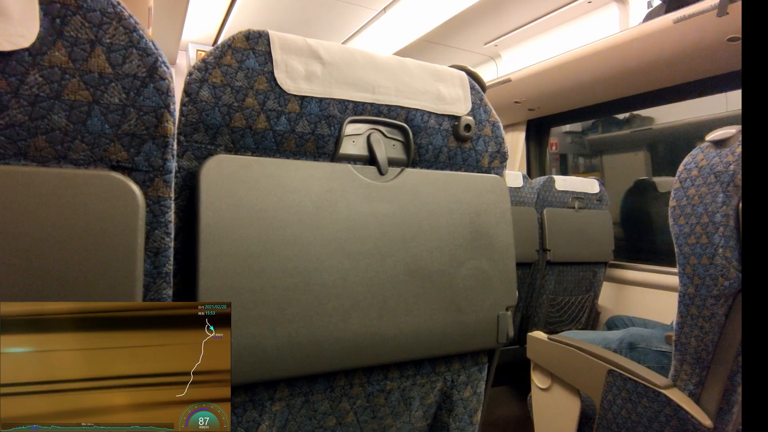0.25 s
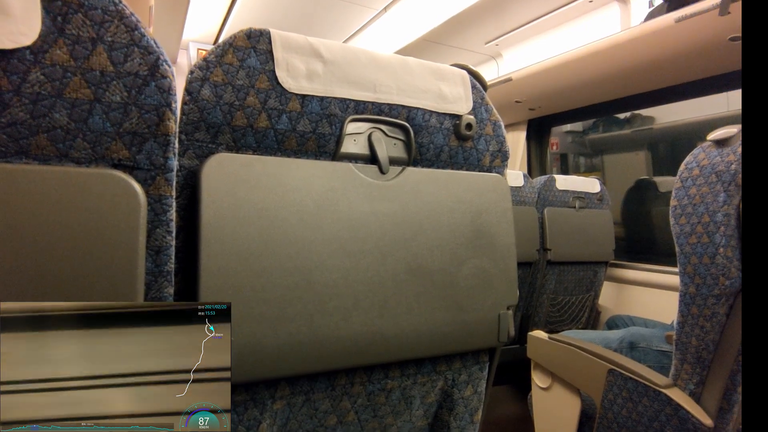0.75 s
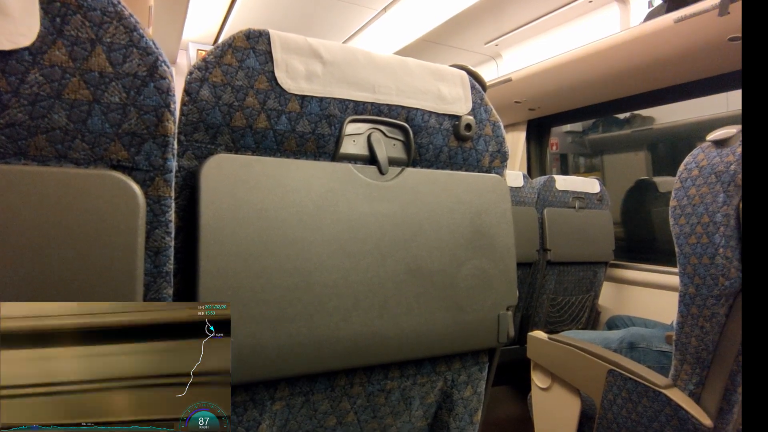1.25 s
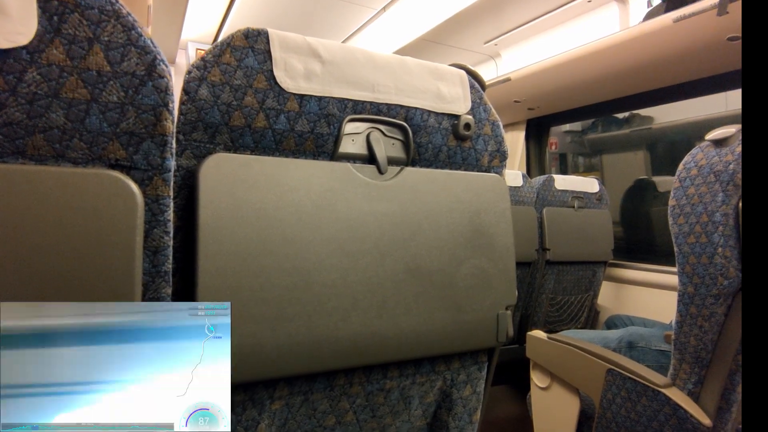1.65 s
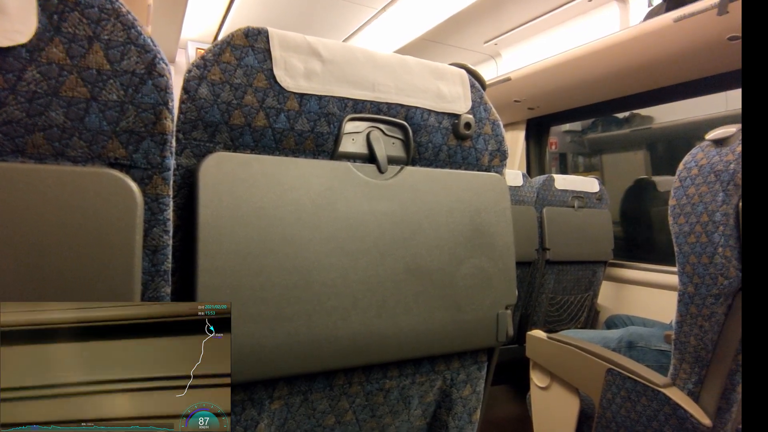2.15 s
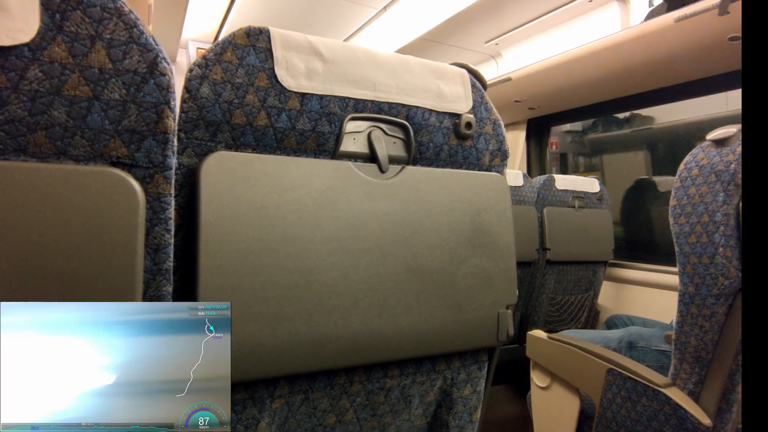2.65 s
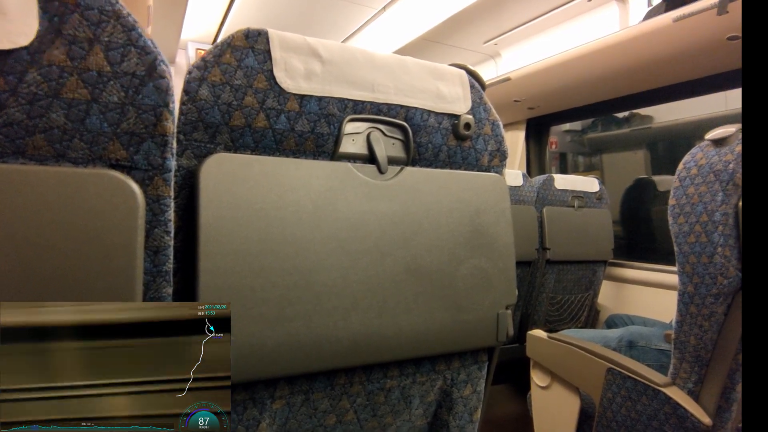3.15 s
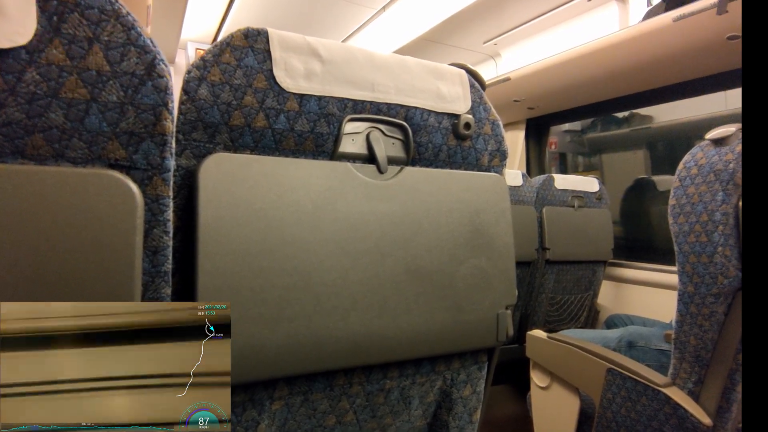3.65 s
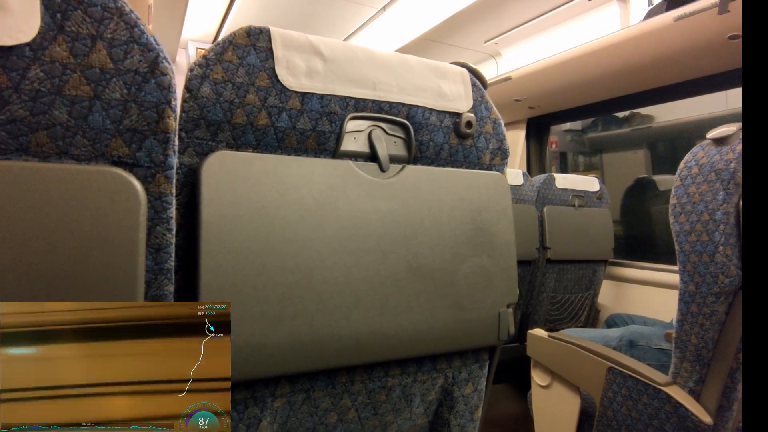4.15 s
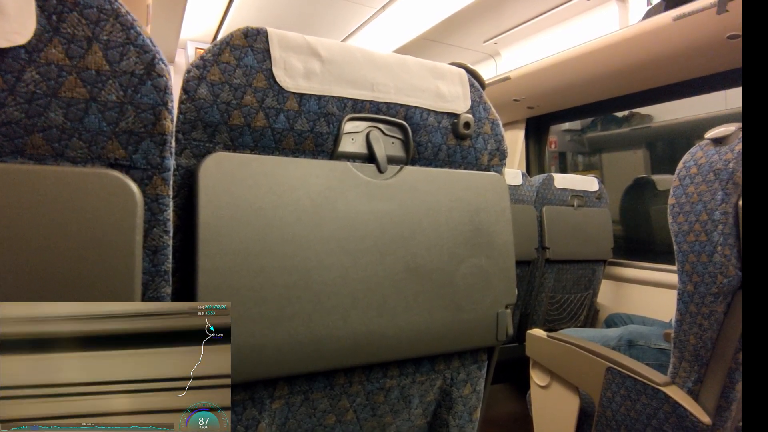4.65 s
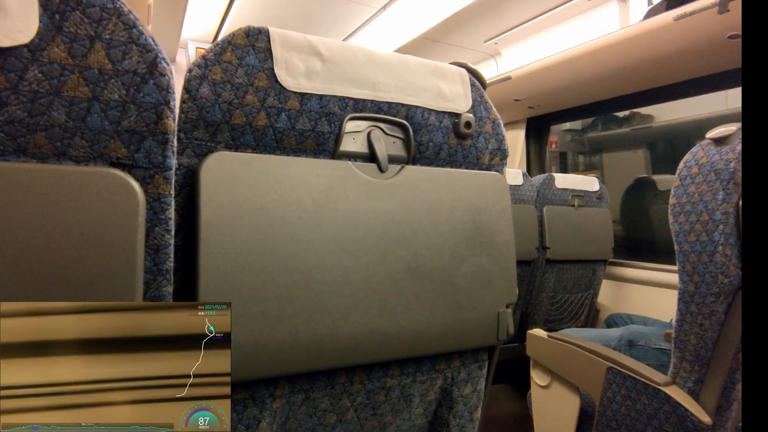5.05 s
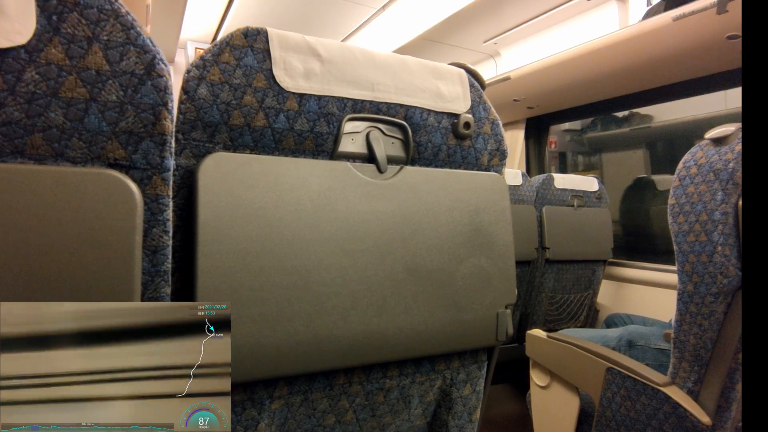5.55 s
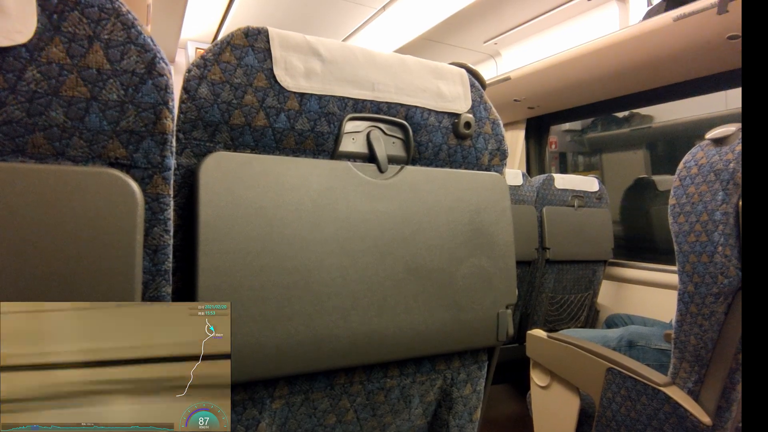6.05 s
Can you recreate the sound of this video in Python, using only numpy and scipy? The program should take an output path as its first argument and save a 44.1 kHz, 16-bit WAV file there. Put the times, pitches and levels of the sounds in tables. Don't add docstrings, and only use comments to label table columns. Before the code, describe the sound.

Heard from a passenger seat, rough rails sing in a fluttering drone with dull floor booms and faint clicks, easing into steady airy rumble.

```python
import sys
import numpy as np
from scipy import signal
from scipy.fft import rfft, irfft
from scipy.io import wavfile
from scipy.ndimage import uniform_filter1d, minimum_filter1d

SR = 44100
rng = np.random.default_rng(int(sys.argv[2]) if len(sys.argv) > 2 else 0)


def waveform_to_disk(signal):
    frames = np.transpose(np.atleast_2d(signal))
    scaled = np.clip(frames, -1, 1) * 32767
    samples = np.round(scaled).astype(np.int16)
    wavfile.write(sys.argv[1], SR, samples)


def amplitude_ratio(level_db):
    exponent = np.asarray(level_db, float) / 20
    return 10 ** exponent


N = 277819
TIME = np.arange(N) / SR
HZ = np.maximum(np.fft.rfftfreq(N, 1 / SR), 1)

# [time_s, roughness_db]
ROUGHNESS = [(0, 2.5), (.6, 2.5), (.95, 1), (1.4, 0), (1.85, 2), (2.4, -1), (2.8, 0), (3.1, -2),
             (3.7, -2.5), (4.3, -5.5), (4.7, -6.5), (5.3, -8.5), (5.9, -11.5), (6.3, -10)]
# [start_s, hold_s, pitch_hz, level_db]
CORRUGATION = [(-.02, 0.038, 698, -16.5), (0.095, 0.11, 719.8, -15.5), (.272, 0.037, 700.7, -17.5),
               (0.343, 0.054, 721, -15), (0.426, 0.029, 716, -19), (0.516, 0.033, 723.4, -15.5),
               (0.573, 0.029, 709.8, -22), (0.635, 0.079, 715.7, -11.5), (0.763, 0.088, 716, -13.5),
               (1.21, 0.099, 709.6, -23.5), (1.456, 0.059, 701, -25.5), (2.04, .12, 710.4, -16),
               (2.58, 0.084, 685.2, -22), (2.83, 0.087, 707.6, -22.5), (2.998, 0.12, 697, -24),
               (3.42, .04, 718, -21.5), (3.523, .1, 701.8, -17.5), (3.699, .12, 703, -24),
               (3.956, 0.033, 690, -24.5), (4.153, 0.028, 698.7, -27.5), (4.232, 0.029, 716, -27.5),
               (4.497, 0.053, 695, -27.5), (4.704, 0.019, 686, -24.5)]
# [time_s, peak_db, pitch_hz]
RAIL_BLOWS = [(0.039, -15, 677.5), (0.106, -15, 724), (0.193, -2.5, 722), (0.242, -13, 727.6),
              (0.273, -8, 690), (0.349, -3, 743), (0.397, -11, 717), (0.517, -2, 746), (0.547, -7.5, 720),
              (0.623, -14.5, 708), (0.722, -7, 715), (0.742, -4.5, 715), (0.883, -9, 709.6),
              (0.997, -9.5, 704), (1.031, -8, 750), (1.132, -18, 730), (1.182, -4, 701), (1.283, -6.5, 709),
              (1.473, -8.5, 697), (1.498, -8, 700), (1.528, -22, 676), (1.66, -11, 720.2),
              (1.956, -30, 714.7), (2.02, -9.5, 704), (2.05, -15, 692.3), (2.074, -3, 708),
              (2.101, -6.5, 708), (2.357, -13.5, 709), (2.403, -8, 725), (2.491, -9.5, 746.7),
              (2.587, -7.5, 684), (2.683, -14, 657), (2.786, -13, 676), (2.847, -9, 712), (2.873, -9, 723),
              (2.958, -12, 667.5), (3.075, -15, 687.6), (3.211, -7.5, 708), (3.525, -14, 689.5),
              (3.669, -9, 703), (4.022, -13, 710), (4.095, -9, 724), (4.165, -11, 694.3),
              (4.204, -12.5, 673), (4.351, -15.5, 721), (4.674, -21, 690), (4.788, -12.5, 673),
              (5.312, -19, 718)]


def along_hz(table):
    frequency_hz, value = np.transpose(table)
    return np.interp(np.log(HZ), np.log(frequency_hz), value)


def along_time(table):
    time_s, *columns = np.transpose(table)
    return [np.interp(TIME, time_s, column) for column in columns]


def resonances(modes, steep):
    power = 0
    for pitch_hz, width_hz, level_db in modes:
        detuning = (HZ - pitch_hz ** 2 / HZ) / width_hz
        power = power + amplitude_ratio(level_db) ** 2 / (1 + detuning ** 2) ** steep
    return np.sqrt(power)


def diffuse(gain):
    # [frequency_hz, signed likeness -1..1]
    likeness = [(60, 0.97), (130, 0.9), (300, 0.87), (400, 0.2), (480, 0.89), (600, -0.27), (850, 0.23),
                (980, -0.19), (1250, -0.37), (1520, -0.25), (1950, 0.94), (2300, -0.14), (2500, -0.21),
                (2750, 0.027)]
    # [frequency_hz, difference_db]
    left_lean = [(60, 4.5), (270, 3), (470, 7), (710, 1), (1000, 3.5), (1400, 5), (2000, 1), (2900, -0.5),
                 (4500, -1.5), (7200, -7.5), (8200, 4.5), (8900, 11)]
    one, other = rfft(rng.standard_normal((2, N)))
    alike = np.clip(along_hz(likeness), -1, 1)
    lean = amplitude_ratio(along_hz(left_lean) / 2)
    left = lean * one
    right = (alike * one + np.sqrt(1 - alike ** 2) * other) / lean
    ports = irfft(gain * np.array([left, right]), N)
    return ports / np.std(ports.mean(axis=0))


def walk(rate_hz):
    span = int(SR / rate_hz)
    held = np.repeat(rng.standard_normal(N // span + 1), span)
    return 0.73 * uniform_filter1d(uniform_filter1d(held, span), span)[:N]


def swell(start_s, hold_s, rise_s, fall_s):
    age = TIME - start_s
    return np.clip(age / rise_s, 0, 1) * np.exp(-np.maximum(age - rise_s - hold_s, 0) / fall_s)


def shaken(steady_db, events):
    power = amplitude_ratio(steady_db) ** 2
    for start_s, hold_s, level_db in events:
        power = power + (amplitude_ratio(level_db) * swell(start_s, hold_s, rise_s=0.034, fall_s=0.15)) ** 2
    return np.sqrt(power)


def blows(table, rise_s, t60_s, lean_db, spread):
    out = np.zeros((2, N + SR))
    age = TIME[:SR // 4]
    ring = (1 - np.exp(-age / rise_s)) * np.exp(-np.log(1000) * age / t60_s)
    ring = ring / ring.max()
    for (time_s, peak_db, pitch_hz), (turn, place) in zip(table, rng.random((len(table), 2))):
        lag = spread * (place - .5) * np.array([[.5], [-.5]])
        start = int(time_s * SR)
        tone = np.sin(2 * np.pi * (pitch_hz * age + turn + lag))
        out[:, start:start + len(age)] += amplitude_ratio(peak_db) * ring * tone
    return out[:, :N] * amplitude_ratio(lean_db * np.array([[.5], [-.5]]))


def unloading():
    width_s, depth = .009, 0.32
    gain = 1
    for time_s, _, _ in RAIL_BLOWS:
        gain = gain * (1 - depth * np.exp(-((TIME - time_s + width_s / 2) / width_s) ** 2))
    return gain


def held_song():
    return sum(amplitude_ratio(level_db) * swell(start_s, hold_s, rise_s=0.014, fall_s=0.027)
               for start_s, hold_s, _, level_db in CORRUGATION)


def shocks(axis):
    # [start_s, hold_s, upper_floor_db, lower_floor_db, wheel_ring_db]
    slabs = [(0.036, 0.13, -28.5, -46, -45), (0.557, 0.18, -24.5, -31.5, -51),
             (0.858, 0.22, -24.5, -25, -42), (1.395, 0.39, -21.5, -27.5, -41.5),
             (1.645, 0.17, -21.5, -22, -37), (1.972, 0.091, -27, -31, -56), (2.266, 0.21, -19.5, -25, -40),
             (2.59, 0.23, -21, -25, -40.5), (2.932, 0.13, -28, -29.5, -58), (3.333, 0.15, -28, -26.5, -43),
             (3.632, 0.18, -25.5, -36.5, -46.5), (3.947, 0.073, -29.5, -36, -58),
             (4.337, 0.3, -50, -36, -51.5), (4.807, 0.082, -38, -32.5, -52),
             (5.199, 0.077, -30.5, -38.5, -55), (5.533, 0.21, -36.5, -33, -51.5),
             (5.862, 0.19, -32.5, -35.5, -50.5)]
    return [(row[0], row[1], row[axis]) for row in slabs]


def rail_roar():
    # [pitch_hz, width_hz, level_db]
    rail_modes = [(714.7, 92, 1), (658, 43, 0), (828, 119, -7), (1044, 74, -15.5), (1431, 140, -21)]
    rough_db, = along_time(ROUGHNESS)
    half_power_db = -11.5
    softened = unloading() / np.hypot(1, held_song() / amplitude_ratio(half_power_db))
    level = amplitude_ratio(-20.5 + rough_db + 0.98 * walk(18))
    return softened * level * diffuse(resonances(rail_modes, steep=2.01))


def rail_song():
    waver_hz, strike_db, strike_lead_s = 7, -2.5, 0.0037
    held_pitch = [(start_s + hold_s / 2, pitch_hz) for start_s, hold_s, pitch_hz, _ in CORRUGATION]
    struck_pitch = [(time_s, pitch_hz) for time_s, _, pitch_hz in RAIL_BLOWS]
    pitch_hz, = along_time(sorted(held_pitch + struck_pitch))
    turns = np.cumsum(pitch_hz + waver_hz * walk(14)) / SR
    lead = np.array([[.5], [-.5]]) * (0.14 + 0.14 * walk(4.3))
    held = held_song() * amplitude_ratio(1.5 + 1.9 * walk(45))
    struck = sum(amplitude_ratio(peak_db + strike_db) * swell(time_s - strike_lead_s, 0, rise_s=.007, fall_s=.011)
                 for time_s, peak_db, _ in RAIL_BLOWS)
    return np.hypot(held * unloading(), struck) * np.sin(2 * np.pi * (turns + lead)) * amplitude_ratio(.9)


def floor_boom():
    # [pitch_hz, width_hz, level_db]
    upper_modes = [(479, 62, 0.5), (505, 228, -1.5), (613, 120, -5)]
    lower_modes = [(439, 67, 0.5), (358, 83, -1.5), (270, 230, -9.5)]
    drive_db = 0.22 * along_time(ROUGHNESS)[0]
    upper = shaken(-29 + drive_db, shocks(axis=2)) * diffuse(resonances(upper_modes, steep=2.02))
    lower = shaken(-34.5 + drive_db, shocks(axis=3)) * diffuse(resonances(lower_modes, steep=1.7))
    return upper + lower


def wheel_ring():
    # [pitch_hz, width_hz, level_db]
    disc_modes = [(1950, 320, -5), (2110, 330, -3.5), (2906, 225, -2), (2764, 420, -7.5), (1459, 366, 3),
                  (3750, 420, -17)]
    drive_db = -41 + .42 * along_time(ROUGHNESS)[0]
    level = shaken(drive_db, shocks(axis=4)) * amplitude_ratio(0.52 * walk(10))
    return level * diffuse(resonances(disc_modes, steep=1.72))


def window_hiss():
    # [pitch_hz, width_hz, level_db]
    window_modes = [(4660, 540, 4.5), (5700, 520, -8.5), (7280, 1500, 1.5), (8720, 280, -2.5)]
    # [start_s, hold_s, level_db]
    gusts = [
        (-.05, 0.13, -54.5),
        (0.255, 0.23, -62),
        (1.657, 0.17, -59),
        (4.38, 0.032, -62),
    ]
    drive_db = -59 + 0.4 * along_time(ROUGHNESS)[0]
    level = shaken(drive_db, gusts) * amplitude_ratio(0.83 * walk(8.4))
    return level * diffuse(resonances(window_modes, steep=1.8))


def knocks():
    # [time_s, peak_db, pitch_hz]
    joints = [(0.668, -27.5, 208.3), (1.715, -14.5, 270), (1.764, -18, 274), (2.532, -23.5, 274),
              (2.727, -24.5, 270), (2.915, -19.5, 276), (3.947, -21.5, 257.6), (4.422, -24.5, 286.1),
              (5.742, -25.5, 222), (6.09, -20, 270), (6.259, -21.5, 259)]
    floor_blows = [(0.695, -19, 494.3), (0.979, -6, 497), (1.022, -11, 487), (1.052, -14, 460),
                   (1.096, -21, 470), (1.529, -4, 480), (1.616, -5.5, 410), (1.806, -13, 444),
                   (1.84, -12, 500), (1.872, -5, 530), (1.906, -6, 505), (1.999, -6.5, 511.2),
                   (2.04, -30, 500), (2.093, -17, 465), (2.34, -7, 479), (2.432, -3, 476.5),
                   (2.482, -5, 477), (2.531, -11, 499), (2.619, -17, 483.6), (2.69, -8, 454),
                   (2.81, -6, 455), (2.86, -9, 463.3), (3.247, -29, 482), (3.396, -19, 471),
                   (3.487, -21, 442.8), (3.549, -10.5, 430), (3.619, -14, 497.5), (4.175, -16, 489),
                   (4.869, -13, 486), (6.174, -14.5, 479)]
    disc_pings = [(.846, -41.5, 1901), (1.166, -37.5, 1820), (1.62, -37.5, 2915), (1.671, -37, 2900),
                  (1.688, -29, 1950), (1.712, -29, 1950), (1.73, -33, 2934), (1.778, -35, 1422),
                  (1.793, -28, 2850), (1.8, -34, 2040), (1.812, -35, 2800), (2.308, -38, 1933),
                  (2.327, -34, 1930), (2.448, -34, 1920), (3.087, -40, 1950), (3.327, -38, 1962),
                  (3.5, -35, 1940), (4.353, -38, 1920), (.283, -53, 4470), (.322, -49, 4440),
                  (.334, -49, 4440), (.358, -50, 4450), (.272, -48, 3780)]
    panel = blows(joints, rise_s=0.0046, t60_s=0.14, lean_db=3.0, spread=.05)
    struck_floor = amplitude_ratio(-7.5) * blows(floor_blows, rise_s=0.0055, t60_s=.08, lean_db=2.5, spread=0.5)
    discs = blows(disc_pings, rise_s=0.0065, t60_s=0.055, lean_db=-1.0, spread=0.3)
    return panel + struck_floor + discs


def squeaks():
    # [middle_s, half_length_s, pitch_hz, width_hz, level_db]
    rubs = [
        (0.035, 0.04, 6850, 140, -57.5),
        (0.057, .04, 8400, 500, -59),
        (0.16, 0.037, 7700, 120, -61),
        (0.345, 0.056, 4450, 80, -61),
        (4.439, 0.016, 7800, 2000, -58),
        (0.055, .025, 7250, 100, -58),
        (2.4, 0.082, 997, 127.6, -32),
        (1.78, 0.11, 7400, 3000, -57.5),
        (1.78, 0.09, 4600, 1200, -56.5),
    ]
    out = 0
    for middle_s, half_s, pitch_hz, width_hz, level_db in rubs:
        envelope = amplitude_ratio(level_db) * np.exp(-((TIME - middle_s) / half_s) ** 4)
        out = out + envelope * diffuse(resonances([(pitch_hz, width_hz, 0)], steep=2.2))
    return out


def air():
    # [frequency_hz, density_db per Hz]
    flow_spectrum = [(12, -17.5), (20, 3), (45, -1.5), (70, -1), (114, -8), (237, -3.5), (309, -8.5),
                     (470, -7), (600, -13.5), (1000, -8), (1460, -26), (2820, -28), (3600, -37),
                     (9900, -61)]
    return amplitude_ratio(-29 + 1.0 * walk(1.5)) * diffuse(amplitude_ratio(along_hz(flow_spectrum)))


def scene():
    rolling = rail_roar() + rail_song() + floor_boom() + wheel_ring() + window_hiss()
    return rolling + knocks() + squeaks() + air()


def low_pass(x):
    return signal.sosfilt(signal.butter(12, 9620, fs=SR, output="sos"), x)


def record(dry):
    top_hz, limit, limit_s = 8900, .78, .004
    mix = signal.sosfilt(signal.butter(16, top_hz, fs=SR, output="sos"), dry)
    span = int(limit_s * SR)
    room = np.minimum(1, limit / (np.abs(mix).max(axis=0) + 1e-9))
    mix = mix * uniform_filter1d(minimum_filter1d(room, span), span)
    return low_pass(mix)


dry = scene()
out = record(dry)
waveform_to_disk(out)
```